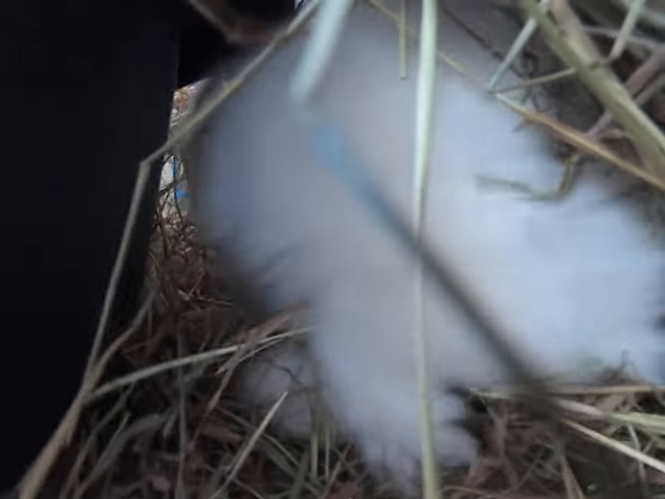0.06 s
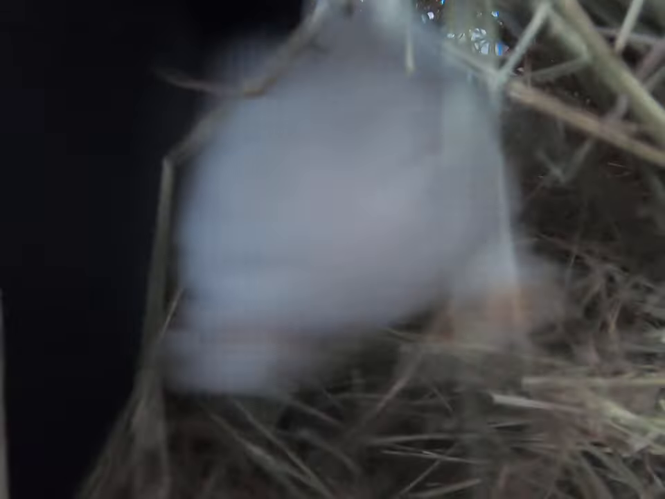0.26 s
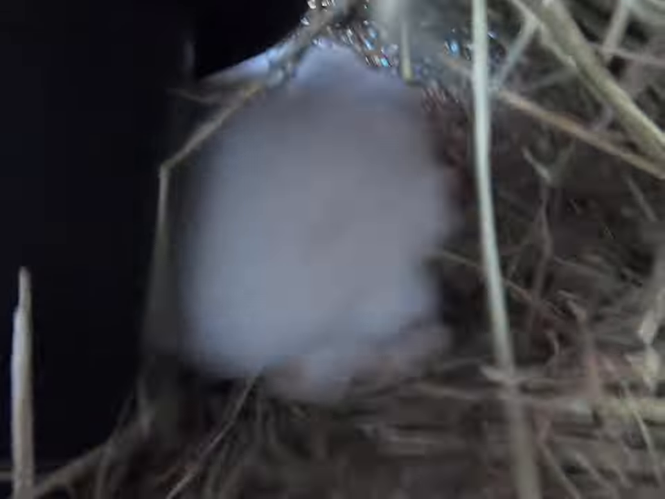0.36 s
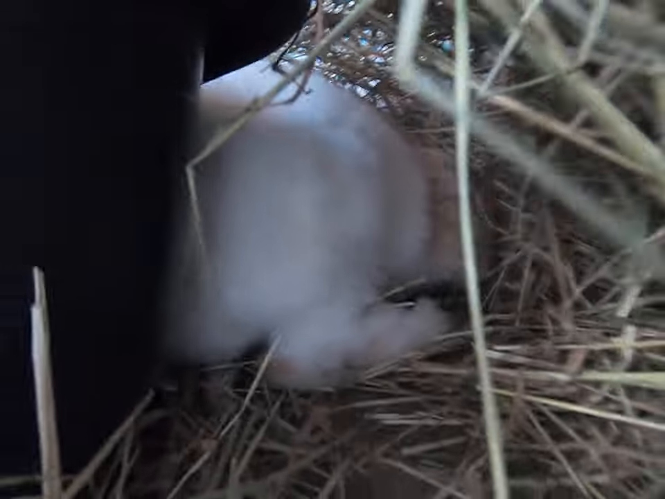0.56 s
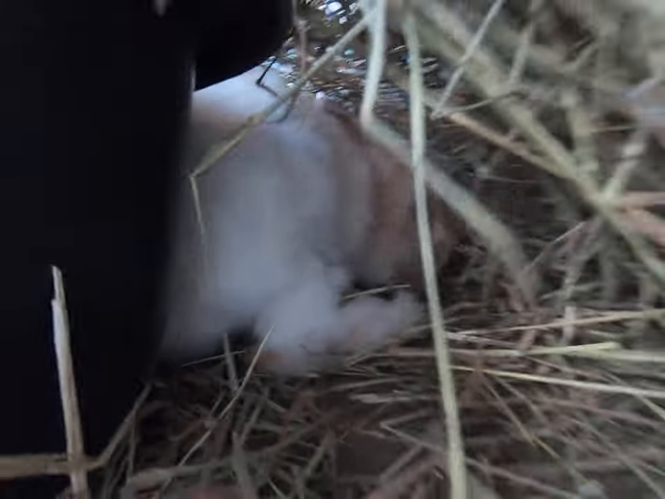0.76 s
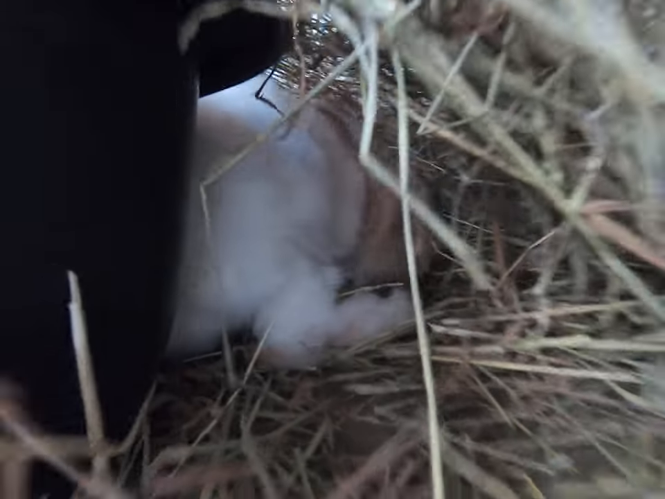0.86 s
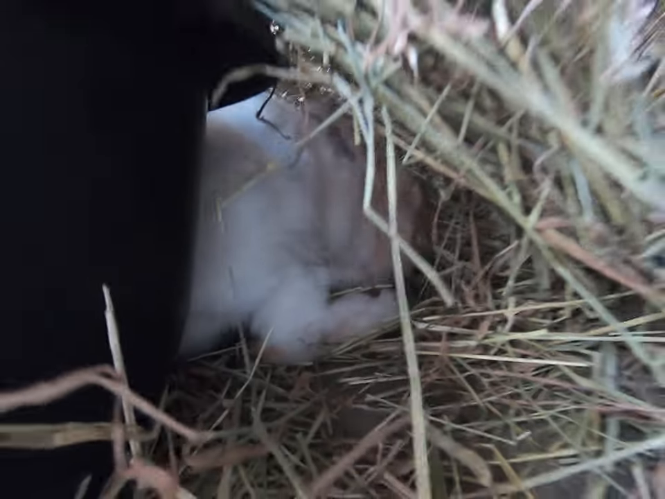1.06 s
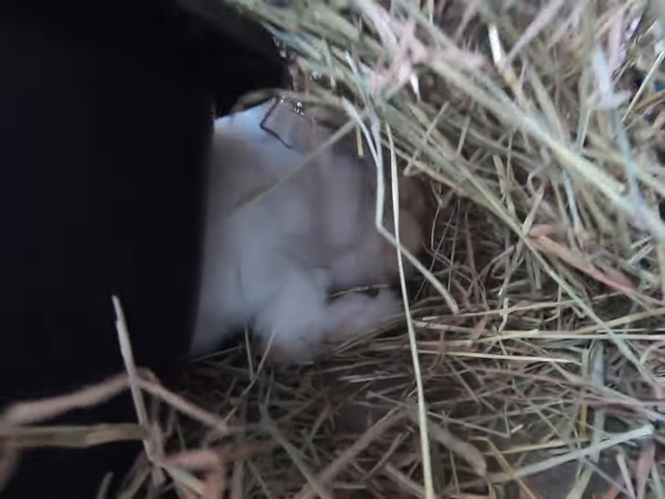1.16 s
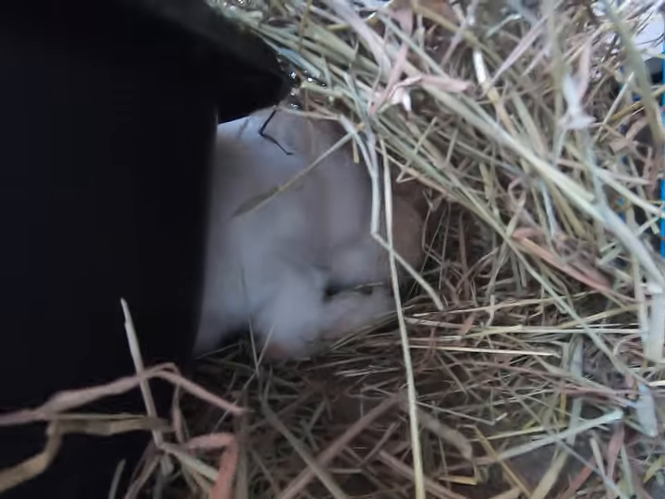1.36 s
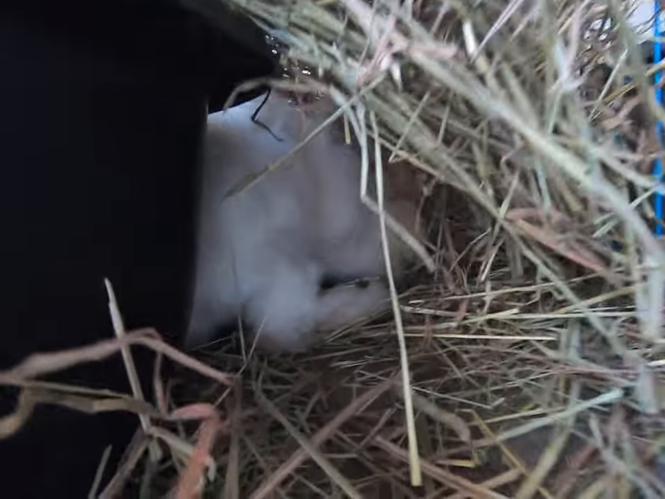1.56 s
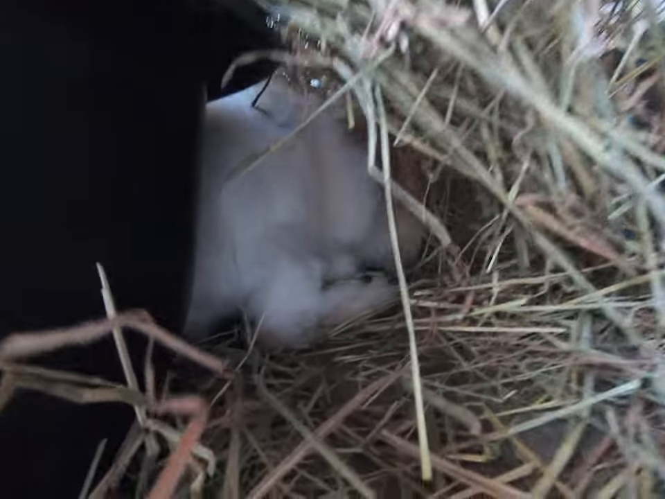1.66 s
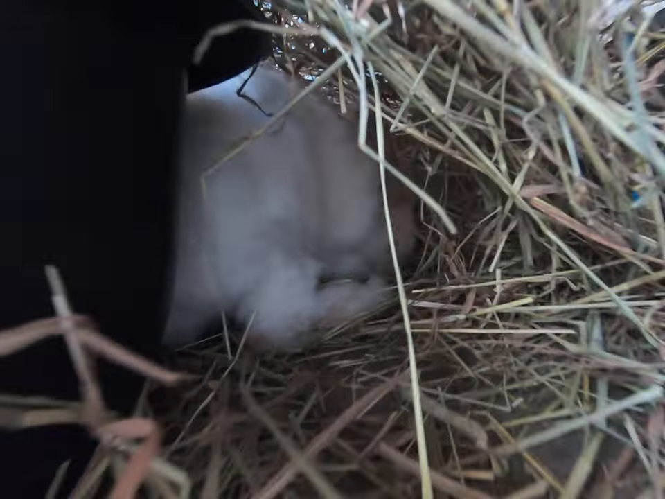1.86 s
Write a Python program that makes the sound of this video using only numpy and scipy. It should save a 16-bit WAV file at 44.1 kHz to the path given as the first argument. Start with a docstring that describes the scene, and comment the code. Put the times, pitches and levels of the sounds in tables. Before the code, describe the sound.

Close, muffled hay rustling as a rabbit moves in its indoor hutch. Its feet thud in an early hop that shakes the floor; after a short lull, stalks slide and snap and paws tap softly. The room hums faintly.

```python
"""A rabbit in a hutch lined with dry hay, right beside a muffled microphone, over a faint room hum.
It opens with a soft hiss; the bedding shuffles, and a thin, very high fizz follows the movement on the left.
A stalk snaps, a paw knocks, and a quarter second in it hops round: its feet thud and the hutch shakes.
After a brief lull it noses about: stalks slide past each other and snap, and from one second on
its paws knock lightly on the floor again and set it droning."""
import sys
import numpy as np
from scipy import signal
from scipy.fft import rfft, irfft
from scipy.io import wavfile

SR = 44100
rng = np.random.default_rng(int(sys.argv[2]) if len(sys.argv) > 2 else 0)


def persist_wave(psi):
    """Save psi, clipped to +-1, as 16-bit WAV."""
    counts = np.round(np.clip(psi, -1, 1) * 32767).astype(np.int16)
    wavfile.write(sys.argv[1], SR, np.atleast_2d(counts).T)


N = 83790
TIME = np.arange(N) / SR
FREQ_HZ = np.fft.rfftfreq(N, 1 / SR)

# air of the room behind the hutch: freq_hz, gain_db
ROOM_SPECTRUM = [(20, -11), (55, 17), (90, -8.5), (200, 6.5), (450, 0), (800, -21.5), (1500, -17.5),
                 (3000, -21), (5000, -29.5), (8000, -37.5), (10500, -46.5), (16000, -74)]
# hum in the room: pitch_hz, level_db
HUM_LINES = [(54, -68), (119.5, -58.5)]
# how hard the body presses and shifts the bedding: time_s, level_db
BEDDING_PRESSURE = [(0, -47), (.14, -43), (.22, -42.5), (.255, -34.5), (.30, -37.5), (.35, -38),
                    (.41, -39.5), (.485, -47), (.53, -56.5), (.61, -45.5), (.66, -45.5), (.77, -46),
                    (.84, -41.5), (.92, -47.5), (1.0, -49), (1.045, -41.5), (1.125, -50), (1.16, -39),
                    (1.2, -43), (1.25, -47.5), (1.33, -44), (1.42, -41), (1.455, -47.5), (1.49, -37.5),
                    (1.57, -47), (1.65, -42), (1.71, -38.5), (1.765, -48), (1.9, -47)]
# bedding pressed lightly, and pressed hard: freq_hz, gain_db
LIGHT_SPECTRUM = [(40, -32), (100, -26.5), (150, -5), (205, 5), (300, -7.5), (450, -2.5), (600, -13),
                  (780, -14), (950, -31.5), (1600, -61)]
HARD_SPECTRUM = [(40, -30), (100, 10), (150, -2), (205, 1), (300, 8.5), (450, -2.5), (600, -1.5),
                 (780, -15), (1000, -27), (1600, -77)]
# soft band of hiss at the opening: time_s, level_db, upper_edge_hz
OPENING_HISS_PATH = [(0, -62.5, 1680), (.07, -60.5, 1740), (.15, -56.5, 1510), (.23, -54.5, 1360),
                     (.32, -50, 790), (.40, -54.5, 943), (.52, -52.5, 730), (.62, -83, 840)]
# rise and fall of the high fizz: time_s, relative_db
FIZZ_CONTOUR = [(0.0, -68), (0.036, -77), (0.094, -68), (0.226, -70.5), (0.258, -60.5), (0.402, -61),
                (0.492, -85), (0.666, -86), (0.688, -77), (0.756, -82.5), (0.798, -71.5), (0.82, -80),
                (0.862, -70.5), (1.01, -85.5), (1.158, -77.5), (1.29, -86), (1.344, -76), (1.438, -85.5),
                (1.496, -75), (1.576, -78), (1.704, -71.5), (1.84, -86), (1.856, -79), (1.9, -77)]
# colour of the fizz: freq_hz, gain_db
FIZZ_SPECTRUM = [(9500, -54), (10800, -25), (11400, -10), (12000, 2.5), (13000, 1), (14200, -3.5),
                 (15800, -11.5)]
# sharp crackles within the fizz: start_s, level_db
FIZZ_CRACKLES = [(.132, -62), (.536, -72), (.695, -70), (.792, -62), (1.083, -71), (1.170, -70),
                 (1.228, -68), (1.345, -68), (1.412, -69), (1.498, -64), (1.856, -64)]
# stalks snapping, and a brighter resonance of the two loudest: peak_s, level_db, pitch_hz, width_octaves
STALK_SNAPS = [(.0238, -33.5, 1840, 0.52), (0.2647, -28.5, 1070, 0.49), (0.2894, -39, 1450, 0.41),
               (.327, -42, 1300, 0.2), (.3688, -21, 996, 0.58), (.4421, -41.5, 820, 0.46),
               (.5956, -40.5, 720, 0.46), (0.8584, -42, 935, 0.54), (.9535, -45, 1050, 0.32),
               (0.9558, -44.5, 1170, 0.41), (1.0651, -41, 910, 0.42), (1.0921, -41, 1070, 0.37),
               (1.1144, -41.5, 990, 0.46), (1.2002, -43.5, 1000, 0.47), (1.2301, -36.5, 1090, 0.48),
               (1.3353, -43, 1400, 0.66), (1.3494, -35, 940, 0.63), (1.3691, -42, 930, 0.42),
               (1.3856, -39.5, 930, 0.42), (1.4237, -36.5, 1130, .55), (1.442, -40.5, 1480, 0.68),
               (1.4541, -36.5, 1170, 0.61), (1.5301, -34, 950, 0.46), (1.6022, -32, 1270, 0.95),
               (1.6831, -43, 840, .45), (1.7459, -44.5, 900, .45), (1.8587, -26, 1530, 0.28)]
STALK_OVERTONES = [(.3688, -46, 3260, 0.29), (1.8591, -38, 2620, 0.29)]
# light knocks of paws on the floor: start_s, strength_db, pitch_hz
PAW_KNOCKS = [(0.079, -20.5, 222), (0.594, -38, 310), (1.045, -22, 212), (1.150, -30, 258),
              (1.239, -25, 228), (1.265, -27, 163), (1.482, -23, 220), (1.614, -26.5, 270),
              (1.696, -32, 227), (1.714, -26, 297), (1.843, -30, 202), (1.870, -31, 280)]
# the floor droning under shuffling paws: peak_s, rise_s, fall_s, level_db
DRONE_SWELLS = [(.35, 0.11, .04, -45), (1.29, .09, 0.17, -51), (1.62, 0.035, 0.24, -48.5)]
# colour of the drone: freq_hz, gain_db
DRONE_SPECTRUM = [(80, -31), (130, -1), (160, 7), (215, -8.5), (270, -22), (500, -56.5)]
# loose hay sliding along the fur: peak_s, rise_s, fall_s, level_db, tilt_db_per_octave
HAY_SWISHES = [(.113, 0.017, 0.013, -65.5, 6), (.29, 0.11, 0.1, -65, 8), (0.329, 0.0014, 0.0039, -52.5, 4),
               (.662, 0.016, 0.02, -46, -1.5), (.715, 0.0098, 0.011, -53, 0.5), (0.794, .04, 0.027, -54, 1),
               (1.115, 0.011, 0.023, -54, -3), (1.231, 0.01, 0.017, -48, -1.5),
               (1.535, 0.058, .02, -58.5, 2), (1.578, 0.025, 0.035, -48.5, 1), (1.87, .02, .06, -57, 1.5)]
# colour of the sliding hay: freq_hz, gain_db
SWISH_SPECTRUM = [(200, -14.5), (500, 8), (1000, 4), (1600, -1.5), (2400, -12.5), (3500, -20), (5000, -32),
                  (7000, -51), (10000, -72)]
# paws scuffing hollowly on the floor: peak_s, half_length_s, level_db, pitch_hz
PAW_SCUFFS = [(0.249, 0.0032, -35, 850), (0.294, 0.022, -36, 558), (0.364, 0.014, -39.5, 422),
              (0.296, 0.0043, -52, 1610), (0.497, 0.014, -42.5, 343), (0.661, .016, -48.5, 537),
              (0.666, 0.01, -47.5, 1000), (0.838, 0.022, -49, 656), (1.709, 0.014, -39.5, 462),
              (1.858, 0.0082, -53.5, 1190)]
# feet landing on the floor: peak_s, strength_db, pitch_hz, width_octaves
FOOT_THUDS = [(.2505, -9, 55, 1), (.297, -22.5, 44.3, 0.88), (.339, -16, 52, 0.7), (.371, -23, 43.3, 1.36),
              (.431, -29, 68.5, 1.61), (.476, -45, 50, 0.21)]
# the hutch shaking under the hop: peak_s, rise_s, fall_s, level_db
SHAKE_SWELLS = [(.335, 0.019, 0.09, -34)]
# colour of the shaking: freq_hz, gain_db
SHAKE_SPECTRUM = [(15, -14), (35, 11), (60, -4.5), (100, -14), (160, -13.5), (260, -47), (600, -77)]


def amp(db):
    """Decibels to gain."""
    return 10 ** (np.asarray(db) / 20)


def unit(x):
    """Scales to rms 1."""
    return x / np.sqrt(np.mean(x ** 2) + 1e-20)


def curve(rows, column=1):
    """One column of a time table, joined by straight lines."""
    rows = np.array(rows)
    return np.interp(TIME, rows[:, 0], rows[:, column])


def colour(x, spectrum):
    """Gives x a spectrum, at rms 1."""
    hz, db = np.transpose(spectrum)
    gain = amp(np.interp(np.log(FREQ_HZ + 1), np.log(hz), db))
    return unit(irfft(rfft(x) * gain, N))


def drift(rate_hz):
    """Slow random motion of rms 1."""
    return unit(irfft(rfft(rng.standard_normal(N)) * np.exp(-(FREQ_HZ / rate_hz) ** 2), N))


def grains(per_s, spread_db):
    """Tiny slips of stalk on stalk: random clicks of uneven size."""
    size = amp(spread_db * np.minimum(rng.exponential(1, N), 4))
    return size * rng.choice([-1., 1.], N) * (rng.random(N) < per_s / SR)


def bell(pitch_hz, octaves):
    """A bell of frequencies around a pitch."""
    return np.exp(-.5 * (np.log2((FREQ_HZ + 1e-6) / pitch_hz) / octaves) ** 2)


def blips(rows, turn):
    """Pulses of a cycle or two; a real turn scales a push, an imaginary one makes a two-way swing."""
    spectrum = 0
    for peak_s, db, hz, octaves in rows:
        band = bell(hz, octaves)
        spectrum += amp(db) * band / band.sum() * np.exp(-2j * np.pi * FREQ_HZ * peak_s)
    return irfft(spectrum * turn, N) * N / 2


def swells(rows):
    """Level of smooth swells, each with its own rise and fall."""
    power = 0
    for peak_s, rise_s, fall_s, db in rows:
        width_s = np.where(TIME < peak_s, rise_s, fall_s)
        power += amp(db) ** 2 * np.exp(-((TIME - peak_s) / width_s) ** 2)
    return np.sqrt(power)


def room(air_db=-53.5, waver=0.083):
    """Steady dull air and two wavering hum lines, behind the hutch."""
    hum = 0
    for hz, db in HUM_LINES:
        level = amp(db) * np.sqrt(2) * (1 + waver * drift(rate_hz=9.9))
        hum += level * np.sin(2 * np.pi * (hz * TIME + rng.random()))
    return hum + amp(air_db) * colour(rng.standard_normal(N), ROOM_SPECTRUM)


def bedding(light_db=-47.5, hard_db=-33):
    """Muffled crunch of packed hay beside the microphone; its colour shifts under more weight."""
    level_db = curve(BEDDING_PRESSURE)
    slips = grains(per_s=1800, spread_db=2.5)
    weight = np.clip((level_db - light_db) / (hard_db - light_db), 0, 1)
    crunch = (1 - weight) * colour(slips, LIGHT_SPECTRUM) + weight * colour(slips, HARD_SPECTRUM)
    return amp(level_db) * crunch


def opening_hiss(low_hz=675):
    """A soft band of hiss at the opening, its steep upper edge sliding down as it swells and fades."""
    hz, frame_s, noise = signal.stft(rng.standard_normal(N), SR, nperseg=512)
    hz = hz[:, None]
    edge_hz = np.interp(frame_s, TIME, curve(OPENING_HISS_PATH, column=2))
    lowpass = 1 / (1 + (hz / edge_hz) ** 24)
    highpass = hz ** 2 / (hz ** 2 + low_hz ** 2)
    hiss = signal.istft(noise * lowpass * highpass, SR)[1][:N]
    return amp(curve(OPENING_HISS_PATH)) * unit(hiss)


def fizz(gain_db=6.5, flutter_db=2, crackle_decay_s=0.0025):
    """Very high, fluttering fizz that comes and goes with the movement, with a few sharp crackles."""
    level = amp(curve(FIZZ_CONTOUR) + gain_db + flutter_db * drift(rate_hz=51))
    for start_s, db in FIZZ_CRACKLES:
        level += amp(db) * (TIME >= start_s) * np.exp(-abs(TIME - start_s) / crackle_decay_s)
    return level * colour(grains(per_s=6000, spread_db=2.5), FIZZ_SPECTRUM)


def snaps():
    """Dry stalks give way almost without ringing; the loudest have a brighter overtone."""
    return blips(STALK_SNAPS + STALK_OVERTONES, turn=1j)


def knocks(rise_s=0.0012, decay_s=0.0033, low_hz=139):
    """Each paw sets the floor ringing briefly; shuffling keeps it droning."""
    rings = np.zeros(N)
    for start_s, db, hz in PAW_KNOCKS:
        age_s = np.maximum(TIME - start_s, 0)
        envelope = (1 - np.exp(-age_s / rise_s)) * np.exp(-age_s / decay_s)
        rings += amp(db) * envelope * np.sin(2 * np.pi * hz * age_s)
    low_cut = signal.butter(2, low_hz, "highpass", fs=SR, output="sos")
    drone = swells(DRONE_SWELLS) * colour(rng.standard_normal(N), DRONE_SPECTRUM)
    return signal.sosfilt(low_cut, rings) + drone


def swishes():
    """Loose stalks slide along the fur in short swells of fine grains, some brighter than others."""
    slips = grains(per_s=3000, spread_db=0)
    out = 0
    for *swell, tilt in HAY_SWISHES:
        tilted = [(hz, db + tilt * np.log2(hz)) for hz, db in SWISH_SPECTRUM]
        out += swells([swell]) * colour(slips, tilted)
    return out


def scuffs():
    """Short rubs of paw on floor, each through one hollow resonance."""
    out = 0
    for peak_s, half_s, db, hz in PAW_SCUFFS:
        rub = irfft(rfft(rng.standard_normal(N)) * bell(hz, octaves=0.23), N)
        out += swells([(peak_s, half_s, half_s, db)]) * unit(rub)
    return out


def thuds(rebound_s=0.011, rebound_db=-5, dulling_s=0.0058):
    """Each landing pushes the floor, which springs back more softly; the hutch shakes under the hop."""
    push = blips(FOOT_THUDS, turn=0.94)
    delay = np.exp(-2j * np.pi * FREQ_HZ * rebound_s)
    dulling = np.exp(-(FREQ_HZ * dulling_s) ** 2)
    rebound = amp(rebound_db) * irfft(rfft(push) * delay * dulling, N)
    shake = swells(SHAKE_SWELLS) * colour(rng.standard_normal(N), SHAKE_SPECTRUM)
    return push - rebound + shake


def scene(fizz_right_db=-38):
    """From the microphone, everything sits in the centre except the fizz, far to the left."""
    centre = thuds() + knocks() + snaps() + bedding() + scuffs() + swishes() + opening_hiss() + room()
    return centre + fizz() * amp([[0], [fizz_right_db]])


def record(dry):
    """The recorder's band limit."""
    edge_hz = 15850
    lowpass = signal.firwin(511, edge_hz, window=("kaiser", 9), fs=SR)
    return signal.oaconvolve(dry, lowpass[None], "same")


dry = scene()
out = record(dry)
persist_wave(out)
```